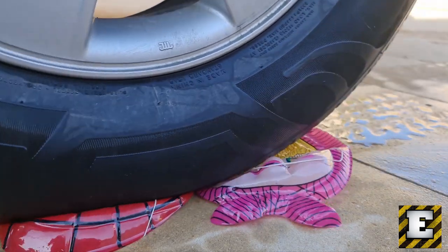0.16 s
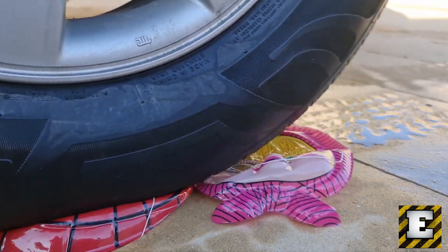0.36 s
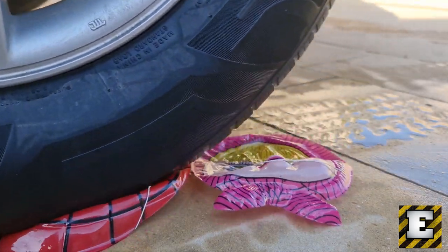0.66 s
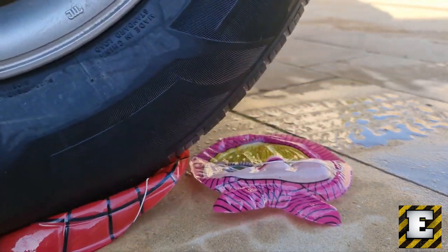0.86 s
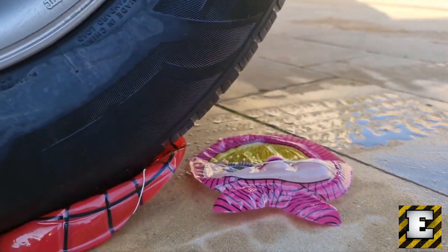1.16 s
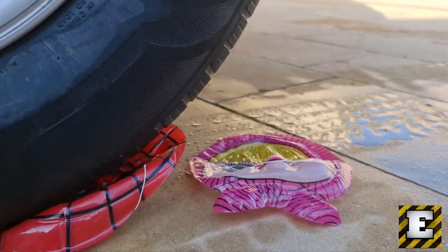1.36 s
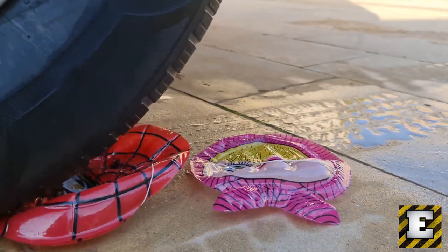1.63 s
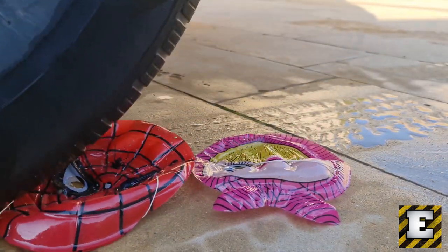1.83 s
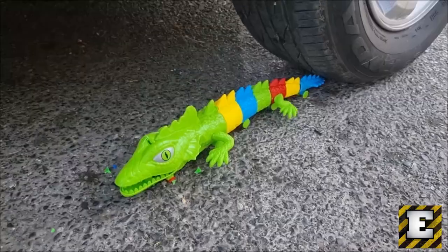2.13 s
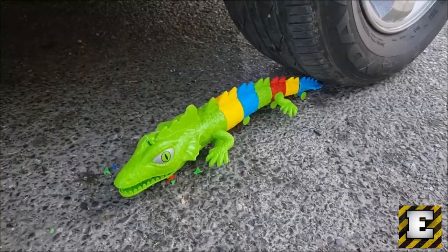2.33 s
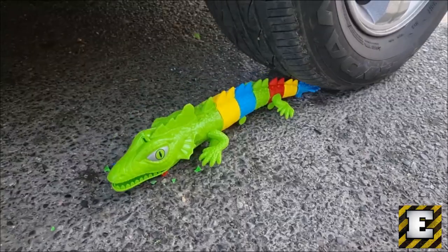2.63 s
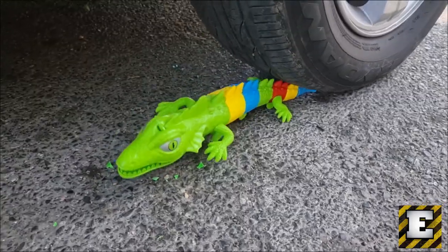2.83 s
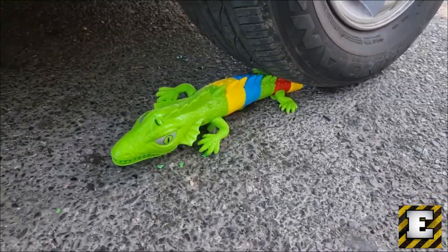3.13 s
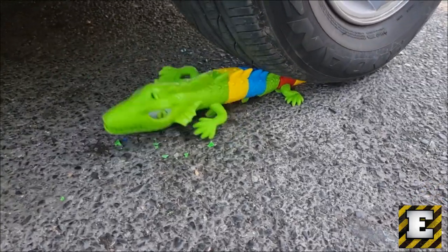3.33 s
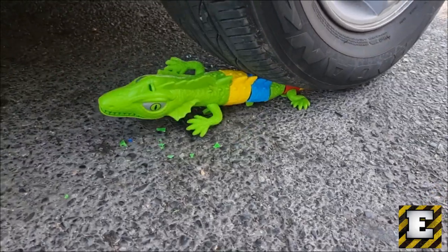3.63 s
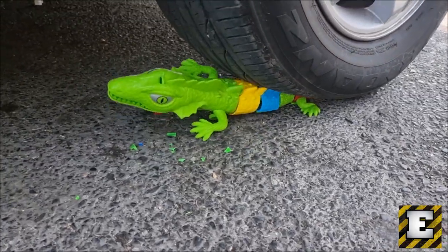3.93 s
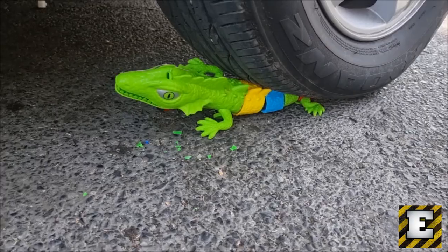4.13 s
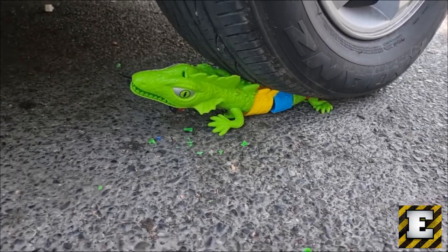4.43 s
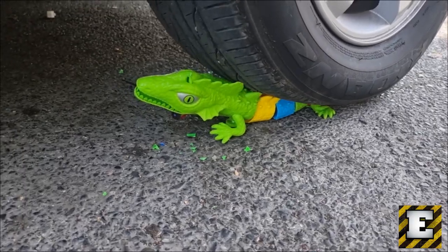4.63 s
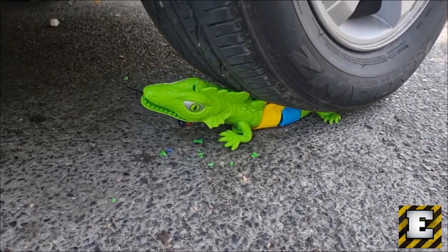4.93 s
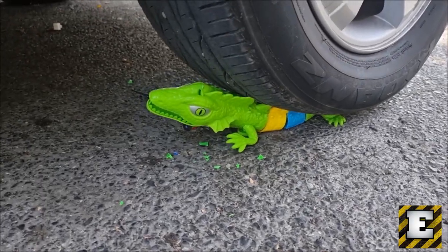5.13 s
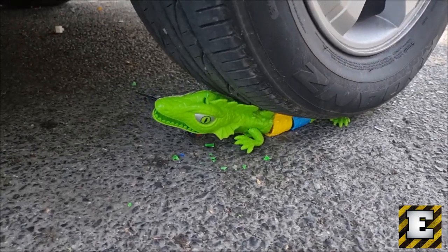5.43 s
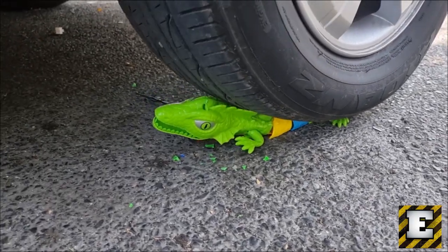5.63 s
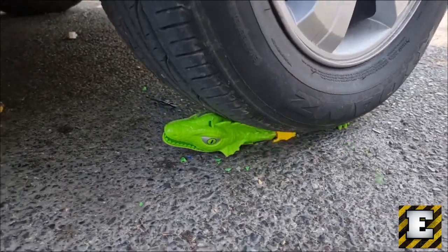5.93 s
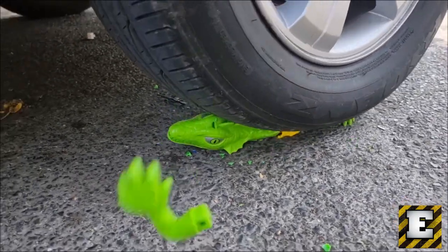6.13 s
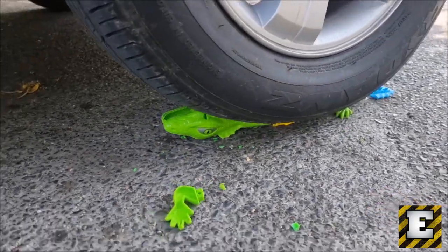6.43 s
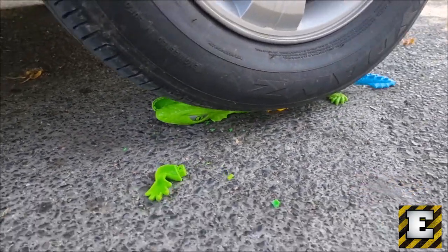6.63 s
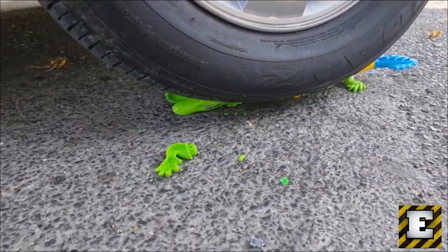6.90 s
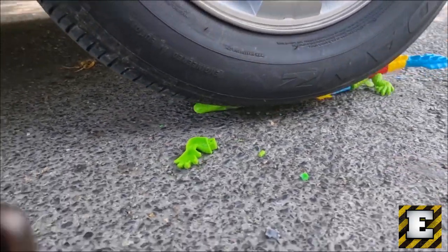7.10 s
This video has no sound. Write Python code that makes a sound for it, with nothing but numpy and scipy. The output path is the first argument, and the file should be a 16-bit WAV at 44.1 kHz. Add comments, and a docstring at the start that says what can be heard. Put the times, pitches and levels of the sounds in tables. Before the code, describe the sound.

Light brittle crackling over a faint distant hum cuts to sharp, violent plastic cracks and scattering splinters under a throbbing, idling car.

```python
"""A hard plastic toy crocodile snaps piece by piece under a slowly creeping car, from two seconds on.
Before it, a thin hollow shell crackles under the tyre. Each crack is a noise burst that rings the
piece and its body and echoes between road and underbody. The car idles: a distant hum by the shell in
a paved yard, then exhaust tones, block knock, gas puffs and fan hiss close by. The loudest cracks
duck the gain and overload the microphone."""
import sys
import numpy as np
from scipy import signal
from scipy.fft import rfft, irfft, next_fast_len
from scipy.io import wavfile
from scipy.ndimage import map_coordinates

SR = 44100
rng = np.random.default_rng(int(sys.argv[2]) if len(sys.argv) > 2 else 0)


def bounce(signal):
    """Save signal as a 16-bit WAV file at the path given by the first command-line argument."""
    frames = np.transpose(np.atleast_2d(signal))
    limited = np.clip(frames, -1, 1)
    pcm = np.round(limited * 32767).astype(np.int16)
    wavfile.write(sys.argv[1], SR, pcm)


N = 320146
TIME = np.arange(N) / SR
NEAR_FROM_S = 2.04  # from the shell to the toy beside the engine

# hard toy's cracks, levels relative: start_s, level_db, brightness_db_per_octave, body_thud_db, pitch_hz,
# left_minus_right_db
TOY_CRACKS = [(2.5102, -26, -7.5, -30.5, 865, 1), (2.5447, -30.5, -4.5, -37, 1220, -1),
              (2.6984, -24.5, -2, -31, 840, -6), (2.705, -17.5, -2, -38, 660, -1),
              (2.9806, -11.5, -1.8, -30, 845, -1), (3.2031, -31, -1, -48, 730, -4),
              (3.5163, -16, -6, -38, 930, -2.5), (3.54, -16.5, 3.5, -33.5, 823, 2),
              (3.8377, -25.5, -1.1, -50, 1070, -4), (3.8589, -20, -1, -45, 1040, 0.5),
              (3.9426, -54, 9, -54, 670, 1), (4.3591, -15.5, -3, -42, 1390, 2),
              (4.4765, -19, 1, -35, 824, -1), (4.5276, -12, -3, -33.5, 1230, -5.5),
              (4.748, -14.5, -1, -54, 1580, -1.5), (5.2601, -11.5, 0, -39, 664, -10),
              (5.4254, -17.5, 2, -59, 1490, 0.5), (5.6396, -34.5, -3.5, -52, 1430, -2),
              (5.7391, -7, -0.6, -29.5, 850, -14), (5.7587, -21.5, -7, -16, 820, -8),
              (5.7992, -35, -9, -29.5, 780, -3), (5.8188, -28, 4, -47, 660, -1),
              (5.8546, -39, 2.5, -62, 660, -6), (5.8902, -17.5, 0.8, -41, 1260, -3),
              (5.8966, -19.5, -0.3, -39, 1420, 5), (5.9415, -39.5, 2, -67, 1690, -1),
              (6.1744, -27, 1, -54.5, 1680, -8), (6.1887, -32.5, 1, -67, 1770, -3),
              (6.2271, -31.5, -4, -65, 1100, -8), (6.2426, -14, -2.5, -37, 1420, -4),
              (6.3047, -38.5, 6.5, -65, 620, -3), (6.3963, -15, 1.7, -67, 836, 0),
              (6.49, -22, 2.5, -61, 1750, -6), (6.5808, -45, 0.5, -62, 990, -1.5),
              (6.7109, -15, -1.5, -24, 964, -4.5), (6.7897, -31.5, -1, -63, 1840, -6),
              (6.8156, -12, -0.5, -27.5, 750, -4), (6.8654, -33, -10.5, -24.5, 870, -4.5),
              (6.9384, -37, -14.5, -28.5, 830, -6), (6.9777, -32, 0, -60, 800, -7),
              (7.075, -18.5, -6, -68, 1410, 0), (7.0845, -22.5, -1, -54, 1250, 2),
              (7.143, -15, -6, -23.5, 705, -3), (7.152, -16.5, -2.5, -20.5, 725, 0),
              (7.212, -27.5, 3, -42, 1250, 1), (7.236, -36.5, -7, -30.5, 730, -7)]
# toy body resonances: centre_hz, width_hz, level_db
TOY_MODES = [(242, 14, -3), (380, 80, 2), (808, 23, 10.5), (1235, 200, 6.9), (2916, 290, 12),
             (4000, 1100, 9), (6300, 930, 6), (12200, 1600, 8)]
# fine crackle of the loaded shell, relative: time_s, level_db
SHELL_LOAD = [(0, -35), (.22, -42), (.31, -47.5), (.52, -38.5), (.68, -41), (.83, -46.5), (1.03, -52.5),
              (1.11, -30), (1.19, -44), (1.28, -36.5), (1.36, -49.5), (1.7, -72)]
# borders of the thud, knock, snap, sizzle and air ranges: border_hz
RANGES_HZ = [180, 550, 1900, 5500, 9500, 16000]


def from_db(db):
    """Decibels to gain."""
    return 10 ** (np.asarray(db) / 20)


def rms_one(x):
    """Scale to rms 1."""
    return x / np.sqrt(np.mean(x ** 2) + 1e-20)


def in_time(rows):
    """Each column of a curve at every sample."""
    s, *columns = np.transpose(rows)
    return [np.interp(TIME, s, column) for column in columns]


def at_hz(points, hz):
    """Read a table on a log-frequency axis."""
    f, value = np.transpose(points)
    return np.interp(np.log(hz + 1e-3), np.log(f), value)


def add(out, x, s):
    """Mix a sound in at a time."""
    i = max(round(s * SR), 0)
    out[..., i:i + x.shape[-1]] += x[..., :N - i]


def band(low_hz, high_hz):
    """A band-pass filter."""
    return signal.butter(3, [low_hz, high_hz], "band", fs=SR, output="sos")


def resonance(x, hz, width_hz):
    """A two-pole resonance with gain 1 on top."""
    r = np.exp(-np.pi * width_hz / SR)
    zeros = np.array([1, 0, -1]) * (1 - r * r) / 2
    poles = [1, -2 * r * np.cos(2 * np.pi * hz / SR), r * r]
    return signal.lfilter(zeros, poles, x + 1e-18)


def ringing(x, modes):
    """An excitation together with the resonances that it rings."""
    return x + sum(from_db(db) * resonance(x, hz, width_hz) for hz, width_hz, db in modes)


def drift(steps_per_s):
    """Slow random wandering, smooth between normal draws of spread 1."""
    steps = rng.standard_normal(2000)
    return map_coordinates(steps, [TIME * steps_per_s], order=3, mode="wrap")


def coloured(x, colour):
    """Give a signal a spectrum; rms 1."""
    size = next_fast_len(N)
    hz = np.arange(size // 2 + 1) * SR / size
    shaped = irfft(rfft(x, size) * from_db(at_hz(colour, hz)), size)
    return rms_one(shaped[..., :N])


def stereo_noise(colour, side_db):
    """Steady noise with some width."""
    mid, side = rng.standard_normal((2, N))
    return coloured(mid + from_db(side_db) * side * [[1], [-1]], colour)


def placed(x, pan_db, lag_ms):
    """Positive pan is louder at the left port, positive lag reaches the right port later."""
    i = np.arange(len(x))
    gains = rms_one(from_db([[pan_db / 2], [-pan_db / 2]]))
    half_lag = round(lag_ms * SR / 2000)
    left = np.interp(i + half_lag - 12, i, x, 0, 0)  # 12 samples of common delay
    right = np.interp(i - half_lag - 12, i, x, 0, 0)
    return gains * np.array([left, right])


def range_levels(db, brightness, colour_db):
    """Levels of the knock, snap, sizzle and air ranges: a sharper break tilts them upward."""
    centres_hz = np.sqrt(np.multiply(RANGES_HZ[1:-1], RANGES_HZ[2:]))
    return db + np.array(colour_db) + brightness * np.log2(centres_hz / centres_hz[1])


def shard_modes(count):
    """Each broken piece has a few short-lived modes of its own."""
    low_hz, high_hz, sharpness_q, level_db = 2235, 8520, 58, 11.5
    centres_hz = np.exp(rng.uniform(np.log(low_hz), np.log(high_hz), count))
    return [(hz, hz / sharpness_q, level_db) for hz in centres_hz]


def cracks(table, modes, run_s, ring_db, ring_width_hz, echo_db, lag_ms, lag_spread_ms):
    """A fracture runs for about a millisecond, rings the broken piece and the body, and echoes under the car."""
    # echo under the car, one row per range: t60_s
    echo_t60_s = [0.33, 0.1, 0.095, 0.079, 0.057]
    # unequal colour of the microphone ports, one row per range: left_minus_right_db
    port_balance_db = [1.5, 2.5, -3, 4, 0.5]
    out, t = np.zeros((2, N)), np.arange(SR // 7) / SR
    filters = [band(low_hz, high_hz) for low_hz, high_hz in zip(RANGES_HZ, RANGES_HZ[1:])]
    for s, *levels_db, pitch_hz, pan_db in table:
        tear, reflections = rng.standard_normal(len(t)), rng.standard_normal((2, len(t)))
        lag = lag_ms + lag_spread_ms * rng.standard_normal()
        piece = [*modes, *shard_modes(count=8), (pitch_hz, ring_width_hz, ring_db)]
        direct = ringing(tear * np.exp(-t / run_s) * (1 - np.exp(-t / 0.000094)), piece)
        # every piece breaks at a new spot, so its reflections are its own
        scatter = ringing(reflections * (1 - np.exp(-t / 0.0011)), piece)
        for sos, db, t60_s, port_db in zip(filters, levels_db, echo_t60_s, port_balance_db):
            tilt_db = pan_db + port_db
            snap = placed(rms_one(signal.sosfilt(sos, direct)), tilt_db, lag)
            decay_db = -60 * t / t60_s + np.array([[1], [-1]]) * tilt_db / 4
            echo = rms_one(signal.sosfilt(sos, scatter) * from_db(decay_db))
            # a range's level is that of its energy spread over 10 ms
            gain = from_db(db) * np.sqrt(SR / 100 / len(t))
            add(out, gain * (snap + from_db(echo_db) * echo), s)
    return out


def toy_cracks(level_db, echo_db):
    """The hard toy breaks loudly, close under the car floor."""
    # typical toy crack, rows knock, snap, sizzle, air: level_db
    colour_db = [-6.5, 1, -2.5, -7.5]
    table = []
    for s, db, brightness, thud_db, hz, pan_db in TOY_CRACKS:
        table.append((s, thud_db, *range_levels(db, brightness, colour_db), hz, pan_db))
    broken = cracks(table, TOY_MODES, run_s=0.0015, ring_db=11.5, ring_width_hz=264,
                    echo_db=echo_db, lag_ms=.09, lag_spread_ms=0.092)
    return from_db(level_db) * broken


def grains(per_s, spread_db):
    """Tiny fractures at random moments, most weak and a few strong."""
    sizes = from_db(spread_db * np.minimum(rng.exponential(1, N), 4)) * rng.choice([-1, 1], N)
    return sizes * (rng.random(N) < per_s / SR)


def tears(ticks):
    """Each tick is a tiny tear with a short rattle after it."""
    t = np.arange(SR // 40) / SR
    energy = np.exp(-t / .00015) + .006 * np.exp(-t / .005)
    envelope = np.sqrt(np.abs(signal.fftconvolve(ticks ** 2, energy)[:N]))
    return envelope * rng.standard_normal(N)


def crunches(per_s, lag_ms):
    """Dense noisy crunch around the loudest breaks, with a short rise and a fall."""
    # crunch envelopes: peak_s, level_db, rise_s, fall_s
    peaks = [(2.509, -17.5, 0.0047, 0.022), (2.701, -23, 0.0085, 0.029), (5.256, -15, 0.0065, 0.025),
             (5.741, -12, 0.0062, 0.023), (6.245, -16, 0.0047, 0.0081), (6.395, -14.5, 0.0062, 0.02),
             (7.145, -17, 0.0047, 0.011)]
    envelope = sum(from_db(db) * np.exp(-np.maximum((s - TIME) / rise_s, (TIME - s) / fall_s))
                   for s, db, rise_s, fall_s in peaks)
    ticks = ringing(grains(per_s, spread_db=3.5), TOY_MODES)
    # hz, level_db
    colour = [(200, -23), (600, 5.0), (1800, -6.5), (3500, 1), (7000, -2.5), (10000, -6), (15000, -6)]
    return placed(envelope * coloured(ticks, colour), -1.2, lag_ms)


def splinters(per_s, level_db, rise_s, fall_s, lag_ms):
    """Plastic splinters scatter around each toy crack and die away."""
    # splinter spectrum: frequency_hz, level_db
    colour = [(250, -36.5), (600, -1.5), (1250, -6), (2000, -1.5), (3000, -1.5), (7000, 0.5),
              (15000, -17.5)]
    envelope, t = np.zeros(N), np.arange(-SR // 10, SR // 4) / SR
    shape = np.exp(-np.maximum(-t / rise_s, t / fall_s))
    for s, db, *_ in TOY_CRACKS:
        add(envelope, from_db(db + level_db) * shape, s + t[0])
    ticks = ringing(tears(grains(per_s, spread_db=1)), TOY_MODES)
    return placed(envelope * coloured(ticks, colour), -1.3, lag_ms)


def thumps():
    """The tyre drops as a part caves in; its carcass booms briefly as a decaying sine."""
    # tyre landings: start_s, level_db, pitch_hz, t60_s
    landings = [(4.527, -24, 151, 0.14), (5.759, -20, 120.5, 0.27), (7.144, -20.5, 137, 0.11)]
    out, t = np.zeros(N), np.arange(SR // 2) / SR
    for s, db, hz, t60_s in landings:
        add(out, from_db(db - 60 * t / t60_s) * np.sin(2 * np.pi * hz * t), s)
    return out


def small_cracks(count):
    """The shell keeps giving way in lesser cracks, as strong as its load allows; rows as in main_cracks."""
    until_s, over_load_db, spread_db = 1.45, 4, 1.5
    pitch_hz, pitch_spread_hz = 1460, 450
    tilt_spread_db_per_octave, pan_spread_db = 3.7, 20
    when, size, sharpness, piece, side = rng.uniform(-1, 1, (count, 5)).T
    s = until_s * (np.arange(count) + (1 + when) / 2) / count
    db = np.interp(s, *np.transpose(SHELL_LOAD)) + over_load_db + spread_db * size
    hz = pitch_hz + pitch_spread_hz * piece
    return np.column_stack([s, db, tilt_spread_db_per_octave * sharpness, hz, pan_spread_db * side])


def shell_cracks(level_db, thud_db, echo_db):
    """The light shell has little thud, which follows its knock."""
    # thin shell's main cracks, relative: start_s, level_db, brightness_db_per_octave, pitch_hz,
    # left_minus_right_db
    main_cracks = [(0.0309, -33, -7, 1090, 0), (0.0524, -31.5, -8, 845, 5), (0.0675, -20.5, 2, 1740, -2),
                   (0.0736, -24, -4.5, 655, -6), (0.0838, -25.5, -7, 650, 0), (0.0876, -20.5, -1, 1080, -3),
                   (0.1107, -24.5, -6.5, 764, 0), (0.126, -30.5, -2, 695, 2), (0.1531, -43, -13, 1070, 2),
                   (0.1865, -33, -3.5, 1040, 2), (0.212, -27, -2, 1110, -1), (0.3795, -33, 0.5, 910, -0.5),
                   (0.422, -37.5, -2, 1860, 19), (0.433, -34, 0.5, 1920, -10),
                   (0.4954, -30.5, -0.5, 1830, -1), (0.5089, -31, 0.5, 1150, -16),
                   (0.5198, -29.5, -0.5, 1820, 8), (0.5816, -33.5, 3, 1540, -7),
                   (0.6585, -41, -6.5, 1190, 8), (0.6876, -33, -1.5, 1060, -2), (0.755, -29, 1, 1550, -0.5),
                   (0.7899, -25, 5, 1230, -1), (0.8535, -42, -2, 726, 2.5), (0.8996, -35, -3, 1360, -3),
                   (0.946, -28.5, 9.5, 740, -3), (0.99, -36, -1.5, 1390, -2), (1.076, -23.5, 3.5, 660, 0),
                   (1.1052, -18, 3, 1870, -3), (1.1074, -26.5, 4, 1720, -8), (1.1522, -38, -4, 1690, 18),
                   (1.1779, -33, 3, 1030, 2), (1.265, -25.5, -3, 1410, 0), (1.295, -30, 4, 1620, -1),
                   (1.4571, -36, -1.5, 820, 2)]
    # typical shell crack, rows knock, snap, sizzle, air: level_db
    colour_db = [0, -0.5, 0, -9]
    # shell body resonances: centre_hz, width_hz, level_db
    modes = [(648, 24, -1.5), (1440, 1100, -2.5), (3030, 650, 13), (6300, 1100, 12)]
    table = []
    for s, db, brightness, hz, pan_db in [*main_cracks, *small_cracks(count=32)]:
        levels_db = range_levels(db, brightness, colour_db)
        table.append((s, levels_db[0] + thud_db, *levels_db, hz, pan_db))
    broken = cracks(table, modes, run_s=0.0013, ring_db=15, ring_width_hz=200,
                    echo_db=echo_db, lag_ms=.2, lag_spread_ms=0.085)
    return from_db(level_db) * broken


def crackle(level_db, lag_ms):
    """The shell's creases tick in clumps between its larger cracks."""
    # crackle spectrum: frequency_hz, level_db
    colour = [(250, -48), (550, -10), (1100, -7.5), (1800, 6), (2400, 5), (4000, -7), (6700, -10),
              (9500, -21.5), (12500, -10.5), (16000, -23)]
    load_db, = in_time(SHELL_LOAD)
    ticks = tears(grains(350 * from_db(6 * drift(40)), spread_db=5.5))
    loaded = coloured(ticks, colour) * from_db(load_db + level_db) * (TIME < NEAR_FROM_S)
    return placed(loaded, 1.0, lag_ms)


def near_idle(exhaust_db, block_db, gas_db, fan_db):
    """Exhaust tones beat at the firing rate; the block knocks once a firing; gas puffs and the fan hisses."""
    firings_per_s = 23.3
    # exhaust hum, dips briefly once and later falls away: time_s, level_db
    hum = [(2.06, -27), (2.35, -23), (2.68, -23), (2.73, -50), (2.75, -25), (2.81, -27), (5.25, -31),
           (5.27, -44.5), (5.77, -43.5), (7.26, -43)]
    # exhaust tones: firing_rate_multiple, level_db
    orders = [(1, -27), (2, -8), (3, 5.5), (4, 2), (5, -17), (6, -20)]
    # engine block's steady knock: firing_rate_multiple, level_db
    knock = [(6, -57.5), (7, -47.5), (8, -49.5), (9, -56), (10, -56), (11, -69.5), (12, -62), (13, -68.5),
             (14, -61)]
    # engine noise over time: time_s, rumble_db, hiss_db
    background = [(2.06, -38, -51.5), (2.26, -35.5, -51), (3.3, -41.5, -54.5), (6.66, -47, -60),
                  (7.26, -48.5, -52)]
    # gas rumble spectrum: frequency_hz, level_db
    rumble_colour = [(20, -33), (32, -23.5), (50, 8), (90, 15), (130, -6.5), (220, -7), (400, -19.5),
                     (700, -47.5), (3000, -82)]
    # fan hiss spectrum: frequency_hz, level_db
    hiss_colour = [(180, -47), (300, -5.5), (600, -6), (900, -15), (1800, -15.5), (4200, -17.5),
                   (5000, -25.5), (8000, -24.5), (9700, -46.5), (11000, -33.5), (12700, -27.5),
                   (16000, -33)]
    hum_db, = in_time(hum)
    rumble_db, hiss_db = in_time(background)
    turn = 2 * np.pi * firings_per_s * TIME + .025 * drift(12)
    # the silencer delays the tones unequally, which rounds each pulse into a throb
    exhaust = sum(from_db(db + 1.3 * drift(14)) * -np.cos(k * turn + .3 * (k - 3) ** 2 + .3 * drift(6))
                  for k, db in orders)
    block = sum(from_db(db + 2.5 * drift(13)) * np.cos(k * turn + 0.63 * drift(3.3)) for k, db in knock)
    # the knock follows the rumble's level
    labour_db = rumble_db - np.median(rumble_db)
    tones = from_db(hum_db + exhaust_db) * exhaust + from_db(labour_db + block_db) * block
    puffs = from_db(2 * drift(12)) * (1 + 0.51 * np.cos(turn))
    rumble = from_db(rumble_db + gas_db) * puffs * stereo_noise(rumble_colour, side_db=-6)
    hiss = from_db(hiss_db + fan_db) * stereo_noise(hiss_colour, side_db=1.5)
    return placed(np.sqrt(2) * tones, -.2, .1) + rumble + hiss


def far_idle(waver_db, level_db):
    """A faint, slightly unsteady engine hum of sines wandering in level and phase."""
    # distant idle tones, relative: pitch_hz, level_db
    tones = [(32.3, -51), (91.5, -51), (161.5, -64), (226.1, -69.5), (296.1, -62.5)]
    out = np.zeros(N)
    for hz, db in tones:
        gain = from_db(db + level_db + waver_db * drift(8.8))
        out += gain * np.sqrt(2) * np.sin(2 * np.pi * hz * TIME + 1.28 * drift(5.4))
    return out


def yard_air(level_db):
    """The yard's steady background is wide coloured noise."""
    # yard spectrum: frequency_hz, level_db
    colour = [(12, -42), (20, -20), (39, -18), (58, 0), (93, -7.5), (120, -11.5), (228, -13.5),
              (399, -16.5), (446, -14), (513, -17), (1450, -27), (1780, -21), (2200, -29.5), (16000, -53.5)]
    return from_db(level_db) * stereo_noise(colour, side_db=0.5)


def gain_control(x):
    """A loud crack turns the gain down, and it creeps back up."""
    threshold_db, share_of_excess = -6.5, 0.38
    attack_s, release_db_per_s = 0.041, 9.5
    peak_db = 20 * np.log10(np.clip(np.abs(x).max(axis=0), 1e-6, 1))
    wanted_cut_db = share_of_excess * np.maximum(peak_db - threshold_db, 0)
    # hold the deepest cut so far, less what has been released since
    recovered_db = release_db_per_s * TIME
    cut_db = np.maximum.accumulate(wanted_cut_db + recovered_db) - recovered_db
    r = np.exp(-1 / (attack_s * SR))
    return x * from_db(-signal.lfilter([1 - r], [1, -r], cut_db))


def scene():
    """The shell in the quiet yard, then the toy beside the engine."""
    near = np.clip((TIME - NEAR_FROM_S) / 0.017, 0, 1)
    toy = toy_cracks(level_db=2.5, echo_db=-5) + crunches(per_s=11000, lag_ms=.12) + thumps()
    debris = splinters(per_s=770, level_db=-9, rise_s=0.0064, fall_s=.022, lag_ms=.1)
    shell = shell_cracks(level_db=-1.04, thud_db=-20, echo_db=-4.5) + crackle(level_db=3.5, lag_ms=.19)
    engine = near_idle(exhaust_db=-6, block_db=-1.0, gas_db=8, fan_db=8.0)
    yard = far_idle(waver_db=1.5, level_db=1.5) + yard_air(level_db=-47.5)
    return toy + debris + shell + near * engine + (1 - near) * yard


def record(dry):
    """The loudest cracks duck the gain and overload softly; a steep low-pass cuts the top."""
    cutoff_hz = 16100
    ducked = gain_control(dry)
    clipped = ducked / (1 + ducked ** 6) ** (1 / 6)
    return signal.sosfilt(signal.ellip(10, .1, 80, cutoff_hz, fs=SR, output="sos"), clipped)


dry = scene()
out = record(dry)
bounce(out)
```